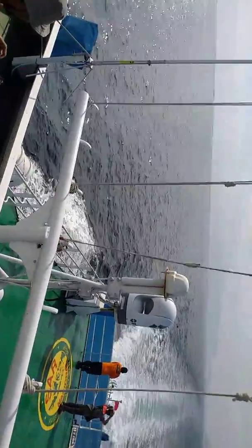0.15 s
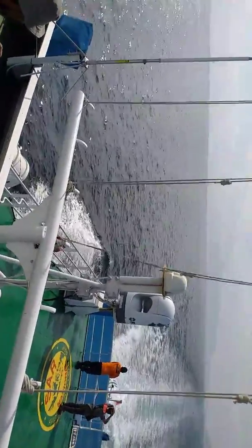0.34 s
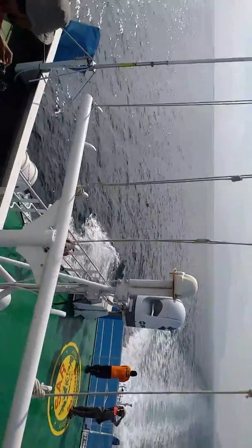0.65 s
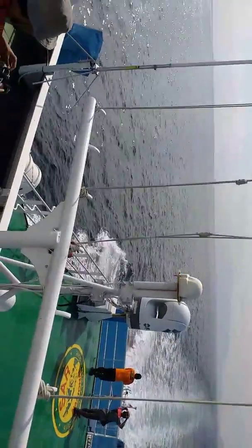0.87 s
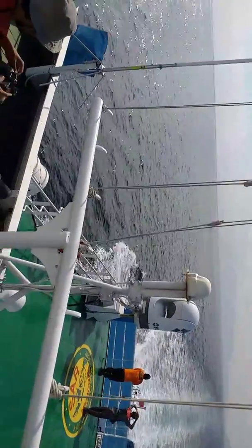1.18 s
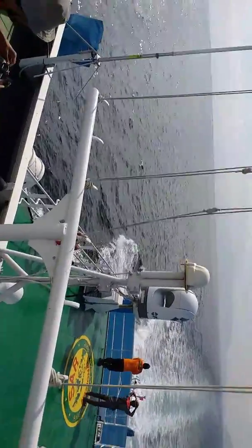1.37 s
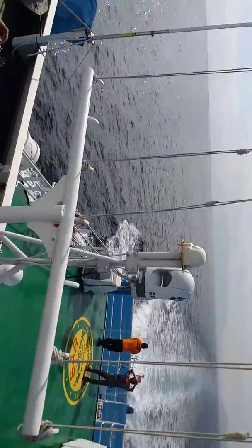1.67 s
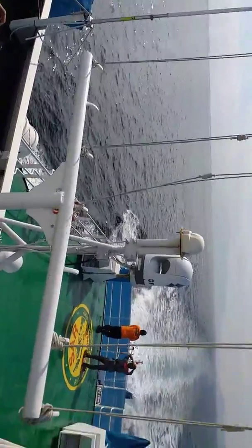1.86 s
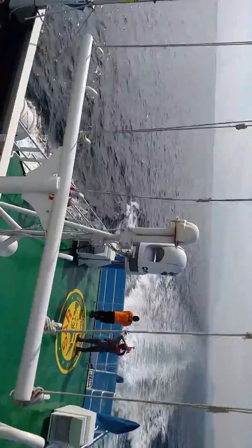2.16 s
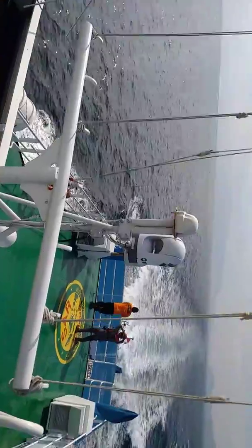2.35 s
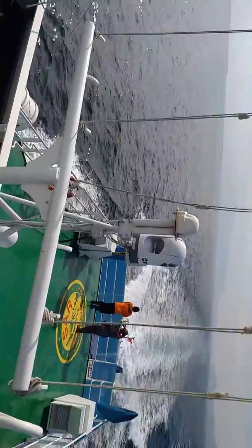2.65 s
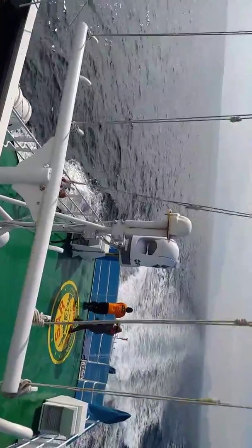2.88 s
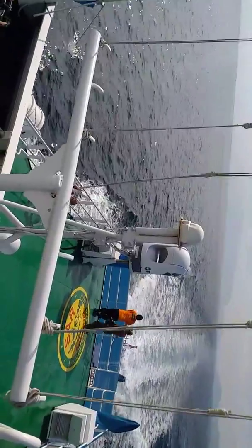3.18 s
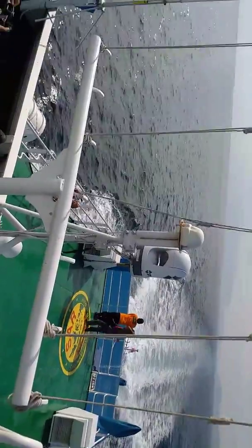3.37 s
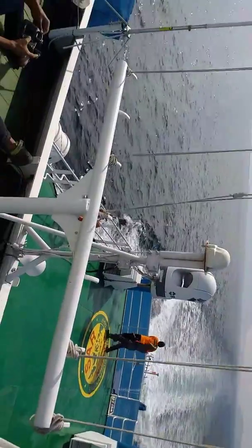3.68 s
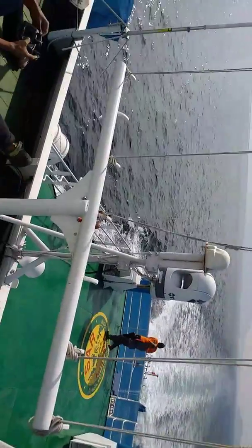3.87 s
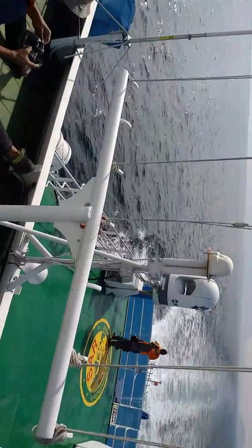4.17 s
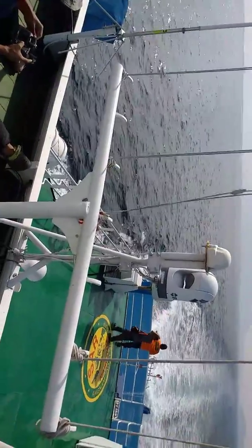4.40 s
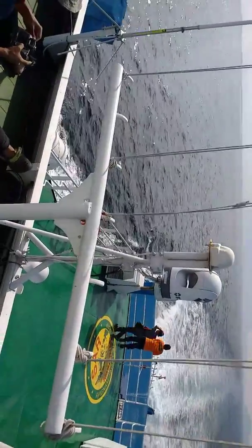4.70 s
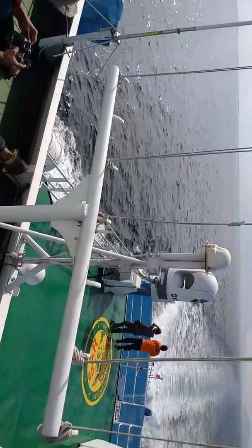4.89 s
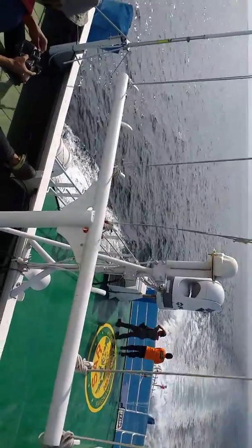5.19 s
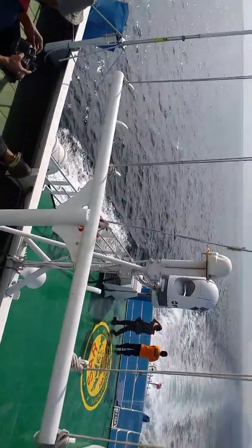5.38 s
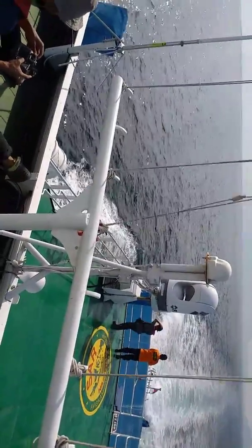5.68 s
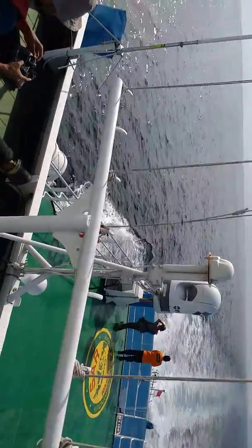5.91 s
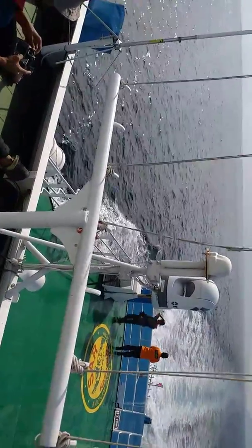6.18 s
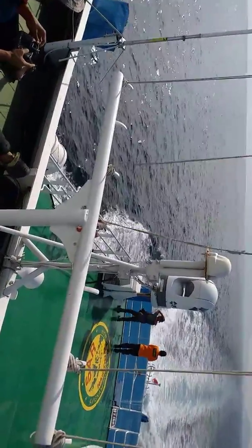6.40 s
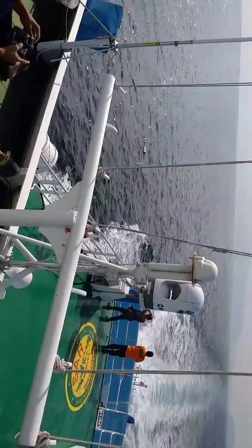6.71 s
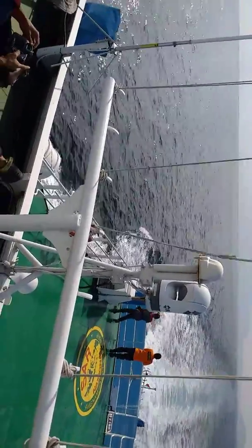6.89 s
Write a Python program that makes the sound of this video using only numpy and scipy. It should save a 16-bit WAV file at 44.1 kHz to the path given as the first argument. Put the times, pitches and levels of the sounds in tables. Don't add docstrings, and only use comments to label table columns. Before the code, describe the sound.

Dull wind buffets, some with a sharp snap, hit the microphone while a deep diesel hum drones and wake water rushes softly far below.

```python
import sys
import numpy as np
from scipy import signal
from scipy.fft import rfft, irfft
from scipy.io import wavfile
from scipy.ndimage import uniform_filter1d, minimum_filter1d

SR = 44100
rng = np.random.default_rng(int(sys.argv[2]) if len(sys.argv) > 2 else 0)


def voltage_ratio(decibels):
    exponent = np.asarray(decibels, float) / 20
    return 10 ** exponent


def persist_wave(psi):
    counts = np.round(np.clip(psi, -1, 1) * 32767).astype(np.int16)
    wavfile.write(sys.argv[1], SR, np.atleast_2d(counts).T)


N = 310905
TIME = np.arange(N) / SR


def coloured(points, shape, spiky=1):
    hz, db = np.transpose(points)
    bins = np.fft.rfftfreq(shape[-1], 1 / SR) + 1
    gain = voltage_ratio(np.interp(np.log(bins), np.log(hz), db, left=-140, right=-140))
    noise = rng.standard_normal(shape)
    jolts = np.sign(noise) * np.abs(noise) ** spiky
    y = irfft(rfft(jolts) * gain, shape[-1])
    return y / np.sqrt(np.mean(y ** 2, axis=-1, keepdims=True))


def smooth(x, size):
    return uniform_filter1d(uniform_filter1d(x, size=size), size=size)


def walk(rate):
    hold = int(SR / rate)
    levels = np.repeat(rng.standard_normal(N // hold + 1), hold)
    y = smooth(levels, hold)[:N]
    return y / y.std()


def curve(table):
    s, db = np.transpose(table)
    return smooth(np.interp(TIME, s, db), 600)


# (time of centre [s], level of body [dB], swirl [dB re body],
# crackle [dB re body], spread [ms])
SLAMS = [(.026, -15, -1.5, -18, 4.3), (.936, -15.5, 0, -9, 4), (.958, -14.5, 0.5, -18, 9.6),
         (.978, -14, 3, -11, 4.3), (.995, -17, 1.5, -17, 7), (2.668, -15, -7.5, -18, 3.1),
         (2.698, -10.5, -0.5, -18, 2.6), (2.787, -14, 3, -17, 4.2), (3.389, -17.5, -4, -17.5, 3.5),
         (3.558, -12, -6, -19, 4.1), (3.671, -13, 6.5, -14, 2.2), (3.683, -11, -8, -12.5, 5),
         (3.916, -17, -6.5, -15.5, 7.2), (4.214, -17.5, -4, -15, 4), (5.166, -6, -5, -9.5, 2.2),
         (5.188, -17, -2.5, -13.5, 5.6), (5.412, -7, -2.5, -11, 2.7), (5.54, -18.5, 7, -12, 5.1),
         (5.566, -18, -2, -19, 4.5), (5.613, -14.5, 0, -14.5, 5.9), (5.851, -14, -8, -14, 7.9),
         (5.864, -18, 1.5, -8.5, 2.6), (6.498, -18.5, -0.5, -16, 3.2), (6.878, -15.5, -5, -12, 4)]
# (time of centre [s], level of body [dB], swirl [dB re body], crackle [dB re body])
PUFFS = [(.366, -26, 4.5, -21), (.477, -22.5, -1, -22), (.555, -21, 0.5, -17), (1.031, -26, -5, -30),
         (1.257, -24, 1.5, -25), (1.268, -22.5, -2, -14), (1.459, -23, 7.5, -21), (1.516, -21, 1.5, -17),
         (1.562, -20, 3, -27), (1.646, -21.5, -1, -32), (1.665, -20.5, 1, -17), (1.687, -26.5, 9.5, -16),
         (2.226, -24.5, 5, -34.5), (2.649, -19.5, 2.5, -17), (2.721, -19, -7, -19.5), (3.015, -27, -8, -21),
         (3.593, -22.5, 5.5, -16), (3.65, -24, -3, -24), (3.936, -19.5, -0.5, -19), (4.031, -23, 2, -16),
         (4.045, -23, 5, -26), (4.19, -22, -2, -17), (4.515, -21.5, -2.5, -11), (4.907, -18.5, -1.5, -23),
         (5.583, -19.5, 0, -22), (6.086, -22.5, -11, -16), (6.511, -22, -9, -8.5), (6.705, -23.5, 3.5, -19),
         (6.868, -18, -5, -20), (2.812, -23.5, 8, -12)]
# (frequency [Hz], level [dB per Hz])
THUMP = [(30, -41.5), (50, -18.5), (75, 2), (130, 2.5), (230, -4.5), (330, -14), (600, -33.5)]
BODY = [(120, -37), (250, 6.5), (400, 1), (650, -5.5), (950, -15), (1600, -43.5)]
CRACKLE = [(500, -25.5), (900, 6.5), (1300, -1), (2100, -13.5), (3100, -29.5), (4500, -45.5), (6500, -75)]


def eddies():
    size = 4096
    puff_ms = 3.98
    rows = [*map(tuple, SLAMS)] + [(*row, puff_ms) for row in PUFFS] + flurries()
    s, body_db, swirl_db, crackle_db, spread_ms = (c[:, None] for c in np.transpose(rows))
    length = spread_ms / 1000
    t = (np.arange(size) - size // 2) / SR
    layers = (  # colour, level [dB], lag [s], stretch
        (THUMP, swirl_db + 3.5, .002, 1.3),
        (BODY, -.3, 0, .8),
        (CRACKLE, crackle_db, -.0012, .65))
    burst = 0
    for colour, db, lag, stretch in layers:
        steepness = np.where(t < lag, .8, 1.2)
        spread = 2 * stretch * np.clip(length, .002, .012) * steepness
        part = coloured(colour, (len(s), size), spiky=5.44)
        part = part * np.exp(-((t - lag) / spread) ** 2) * np.hanning(size)
        energy = np.sum(part ** 2, axis=1, keepdims=True)
        burst = burst + voltage_ratio(db) * part * np.sqrt(length * SR / energy)
    out = np.zeros(N + size)
    np.add.at(out, (s * SR).astype(int) + np.arange(size), voltage_ratio(body_db + 3.0) * burst)
    return out[size // 2:size // 2 + N]


# (time of start [s], length [s], level of body [dB], swirl [dB re body])
FLURRIES = [(.04, .03, -23, -1.5), (.44, .03, -27.5, 4), (.53, .015, -29, 7), (.872, .045, -26, 6.5),
            (1.16, .015, -29.5, 4.5), (1.415, .07, -29.5, 1), (1.868, .012, -27.5, 0),
            (2.235, .035, -32, 6.5), (2.402, .015, -29, 3), (2.56, .08, -27, 2), (2.73, .05, -25, 9),
            (3.175, .045, -35, 13), (3.275, .015, -30.5, -1), (3.565, .025, -24, 1), (3.7, .025, -29.5, -1),
            (3.81, .035, -33.5, 11.5), (3.87, .02, -29, 3.5), (4.095, .015, -30, 0),
            (4.195, .04, -22.5, 0.5), (4.335, .13, -31, 2.5), (4.525, .085, -28, -0.5),
            (4.735, .015, -30.5, 9), (5.258, .015, -30.5, 5.5), (.94, .015, -20, 2.5),
            (5.875, .025, -26.5, 1.5), (6.03, .04, -26, -0.5), (1.903, .012, -28, 2),
            (6.462, .035, -25, 4.5), (6.585, .035, -33.5, 4), (6.9, .06, -30, -0.5)]


def flurries():
    shed_s, small_ms = .013, 4.2
    rows = []
    for start, length, body_db, swirl_db in FLURRIES:
        chance = rng.standard_normal((12, 4))
        jitter = .2 * chance[:, 0].clip(-2, 2)
        times = start + shed_s * (np.arange(12) + jitter + .3)
        for s, c in zip(times, chance):
            if s < start + length:
                rows.append((s, body_db + 1.8 * c[1], swirl_db + 1.9 * c[2], -21 + 3 * c[3], small_ms))
    return rows


# (time [s], peak level [dB])
SNAPS = [(0.9318, -27.5), (0.9746, -23.5), (2.6956, -32.5), (2.786, -33), (3.5568, -31.5), (3.6696, -26),
         (4.2138, -43), (5.164, -36), (5.1847, -33.5), (5.4083, -30), (5.8421, -31), (5.8591, -35),
         (6.5066, -27.5), (6.871, -32)]
# (frequency [Hz], level [dB per Hz])
SNAP = [(900, -21.5), (1500, 4.5), (2300, -3.5), (3300, -13.5), (4800, -28), (6500, -48.5)]


def snaps():
    size = 1024
    s, peak_db = (c[:, None] for c in np.transpose(SNAPS))
    t = np.arange(size) / SR
    snap = coloured(SNAP, (len(s), size)) * (t / .0025) * np.exp(-t / 0.0021)
    snap *= voltage_ratio(peak_db - 0.5) / np.abs(snap).max(axis=1, keepdims=True)
    out = np.zeros(N)
    np.add.at(out, (s * SR).astype(int) + np.arange(size), snap)
    return out


# (time [s], level [dB])
BREEZE = [(0, -32.5), (.49, -34), (.68, -39.5), (.85, -32.5), (1.1, -33), (1.33, -38), (1.6, -32.5),
          (1.98, -39.5), (2.25, -36), (2.75, -28), (2.97, -34), (3.25, -29.5), (4.05, -34.5), (4.53, -29),
          (4.8, -35), (5.3, -30), (6.3, -36.5), (6.7, -30)]


def breeze():
    flutter_db = curve(BREEZE)
    rustle_db = -13.5 + .4 * (flutter_db + 33)
    swirl = walk(35)
    flutter = voltage_ratio(2.02 * swirl + 1.3 * walk(14)) * coloured(THUMP, (N,))
    fine = coloured(BODY, (N,)) + voltage_ratio(-12.0) * coloured(CRACKLE, (N,))
    rustle = voltage_ratio(3.5 * swirl + 2.0 * walk(90)) * fine
    return voltage_ratio(flutter_db + 2.0) * (flutter + voltage_ratio(rustle_db) * rustle)


# (multiple of the cycle rate, level [dB])
ORDERS_DB = [(5, -44), (7, -40), (11, -41), (12, -50)]
# (frequency [Hz], level [dB per Hz])
HULL = [(20, -28.5), (32, -24), (45, -14), (62, -5.5), (100, -2.5), (150, -2), (190, -11), (280, -26),
        (400, -45.5)]


def engine():
    cycle_hz, fan_hz = 13.48, 42
    turn = 2 * np.pi * cycle_hz * TIME + 0.012 * walk(5.0)
    note = voltage_ratio(funnel_db() - .8 + .7 * walk(20)) * np.sin(6 * turn)
    for order, db in ORDERS_DB:
        note += voltage_ratio(db + 2.5 * walk(3)) * np.sin(order * turn + rng.uniform(0, 2 * np.pi))
    note += voltage_ratio(-42) * np.sin(2 * np.pi * fan_hz * TIME)
    vent_air = coloured([(600, -23.5), (645, 6.5), (680, 0.0), (720, -24.5)], (N,))
    vent = voltage_ratio(-51 + 1.4 * walk(3.7)) * vent_air
    hull = voltage_ratio(-37.5 + 2.1 * walk(4.2)) * coloured(HULL, (N,))
    return np.sqrt(2) * note + vent + hull


# (time [s], level [dB])
DRONE = [(0, -22), (.1, -21), (.5, -18.5), (.9, -18.5), (1.15, -21), (1.65, -19), (2.1, -20.5), (2.55, -21),
         (2.75, -13), (3.0, -21.5), (3.55, -20.5), (4.3, -26), (4.53, -22), (5.08, -18.5), (5.6, -19.5),
         (6.2, -20.5), (6.62, -19.5), (7.0, -25.5)]
# (time of centre [s], depth [dB], half length [s])
FADES = [(0, 10, .03), (0.197, 7, 0.036), (0.372, 13, 0.041), (1.25, 13.5, 0.07), (1.34, 24, 0.032),
         (1.483, 8, 0.066), (2.235, 10, 0.057), (2.412, 8, 0.053), (2.822, 8.5, 0.035), (3.356, 11, 0.11),
         (3.645, 8, .03), (3.783, 8, .06), (4.608, 11, 0.025), (4.796, 14, 0.056), (5.503, 1, .04),
         (5.78, 19, 0.051), (5.958, 17, 0.044), (6.122, 22, 0.026), (6.46, 4, .07), (6.732, 8, 0.044),
         (7.05, 10, 0.026)]


def funnel_db():
    fades = sum(db * np.exp(-((TIME - s) / half) ** 2) for s, db, half in FADES)
    return curve(DRONE) - fades


# (time [s], level [dB])
WASH = [(0, -68.5), (.55, -68.5), (.66, -66), (.88, -69), (1.3, -67), (1.64, -70), (2.11, -70.5),
        (2.36, -67), (3.1, -68), (3.35, -69), (3.85, -68), (4.38, -66), (4.72, -65), (5.0, -68), (5.9, -69),
        (6.75, -69.5), (6.95, -66.5), (7.05, -66)]
# (frequency [Hz], level [dB per Hz])
RUSH = [(180, -28.5), (300, -7.5), (470, -9.5), (650, -7), (1150, -13.5), (1500, -14), (2350, -20),
        (2800, -27), (3500, -27), (4100, -30.5), (5050, -33), (5700, -42), (8000, -58), (10400, -90)]
SPRAY = [(4700, -47), (8000, -18.5), (9000, -8.5), (9600, -8), (10300, -2), (11700, 2), (13200, -5),
         (14600, -10), (15000, -16), (15900, -21.5)]


def water():
    spray_db = curve(WASH)
    surge_db = spray_db + 68
    seethe = walk(6.5)
    rush = coloured(RUSH, (N,))
    low = signal.sosfiltfilt(signal.butter(2, 1300, fs=SR, output="sos"), rush)
    top = signal.sosfiltfilt(signal.butter(2, 2800, "high", fs=SR, output="sos"), rush)
    middle = rush - low - top
    rush = voltage_ratio(1.2 * walk(16)) * low + voltage_ratio(1.4 * walk(25)) * middle
    rush += voltage_ratio(.9 * surge_db + 1.16 + 0.9 * walk(30)) * top
    spray = voltage_ratio(spray_db + 0.46 + .5 * seethe + .8 * walk(30)) * coloured(SPRAY, (N,))
    return voltage_ratio(-41.0 + .35 * surge_db + 0.4 * seethe) * rush + spray


# (time [s], level [dB], centre frequency [Hz])
TICKS = [(1.21, -62.5, 13500), (5.143, -48, 3800), (3.915, -53, 3000), (3.672, -46, 3900),
         (3.672, -66, 7000), (.934, -51, 2700), (.976, -35, 2150), (0.031, -34, 1300), (5.167, -9.5, 800),
         (5.79, -52, 3900), (1.476, -36, 800), (5.842, -27, 940), (5.411, -46, 3000), (6.508, -44, 2700),
         (5.845, -48, 3100), (.945, -38, 1700), (3.557, -44, 2500)]


def ticks():
    out = np.zeros(N)
    for s, db, hz in TICKS:
        band = [(.6 * hz, -30), (.8 * hz, 0), (1.15 * hz, 0), (1.3 * hz, -30)]
        out += voltage_ratio(db) * np.exp(-((TIME - s) / .004) ** 2) * coloured(band, (N,))
    return out


def scene():
    wind = eddies() + snaps() + breeze()
    return (wind + engine() + water() + ticks())[None]


def band_limit(x):
    return signal.sosfilt(signal.butter(12, 15630, fs=SR, output="sos"), x)


def record(dry):
    mic_low_hz, ceiling = 57.4, .705
    heard = signal.sosfilt(signal.butter(4, mic_low_hz, "high", fs=SR, output="sos"), dry)
    gain = minimum_filter1d(np.minimum(1, ceiling / (np.abs(heard) + 1e-9)), size=257)
    mix = heard * smooth(gain, 128)
    return band_limit(mix)


dry = scene()
out = record(dry)
persist_wave(out)
```